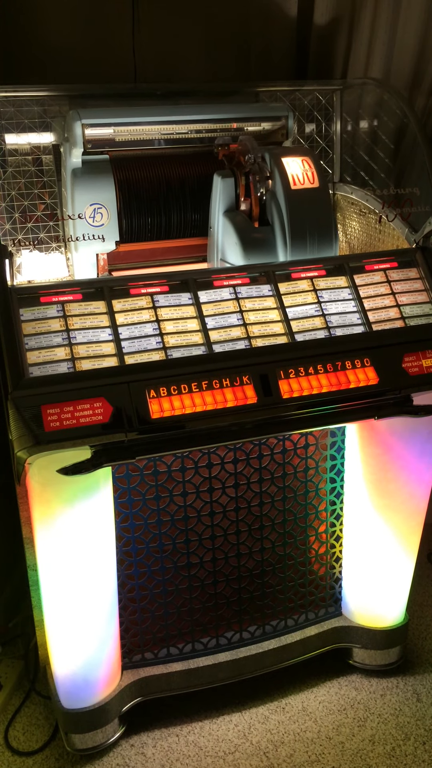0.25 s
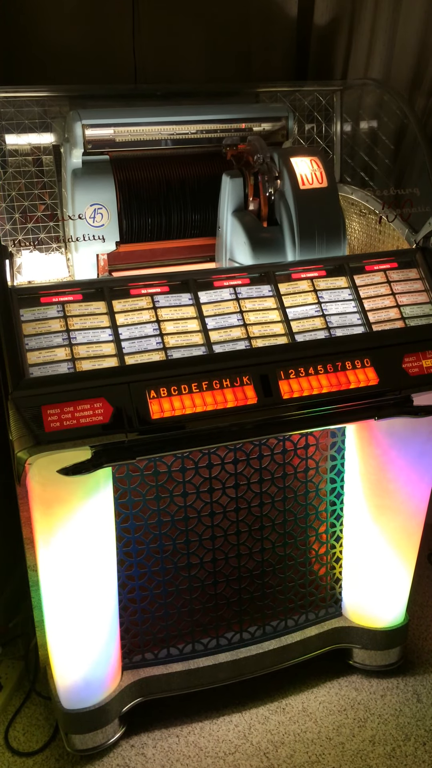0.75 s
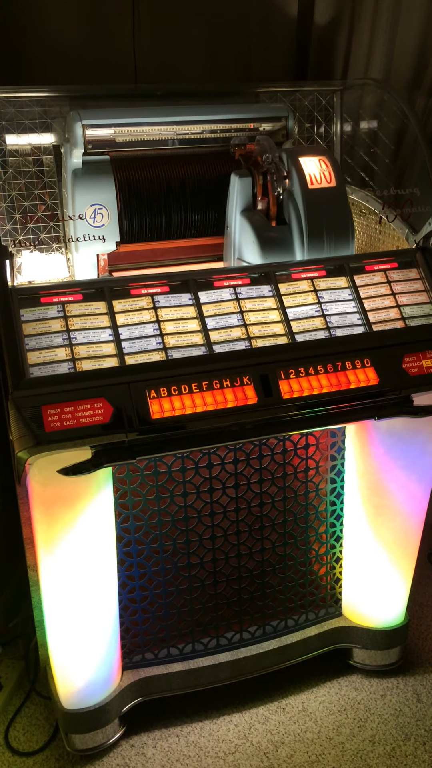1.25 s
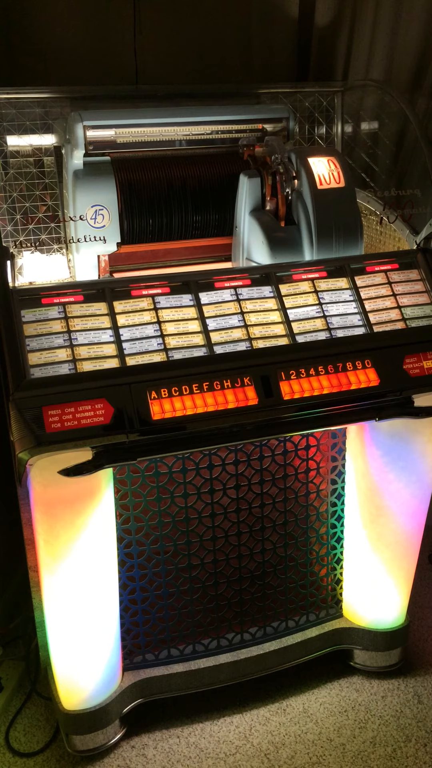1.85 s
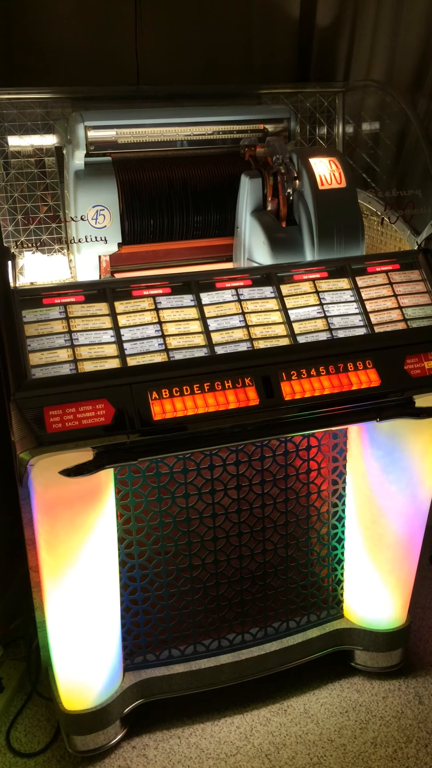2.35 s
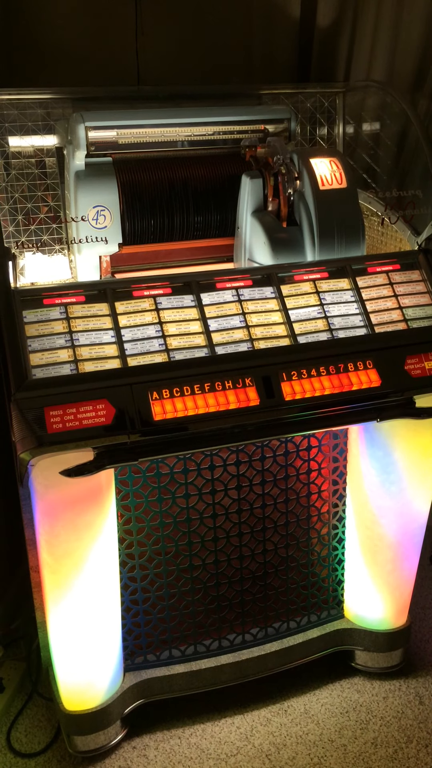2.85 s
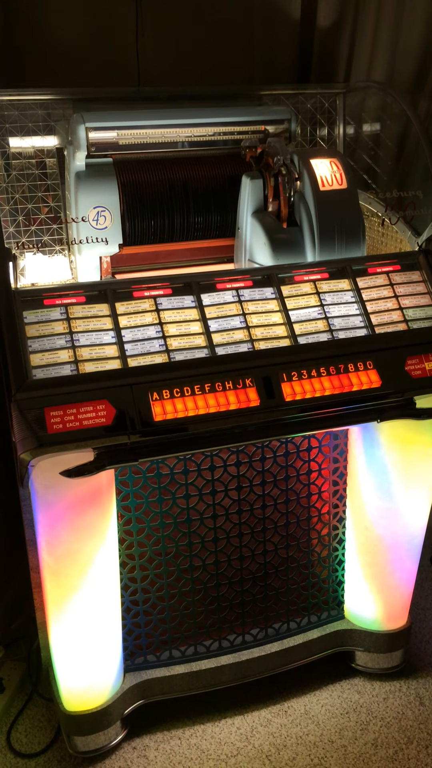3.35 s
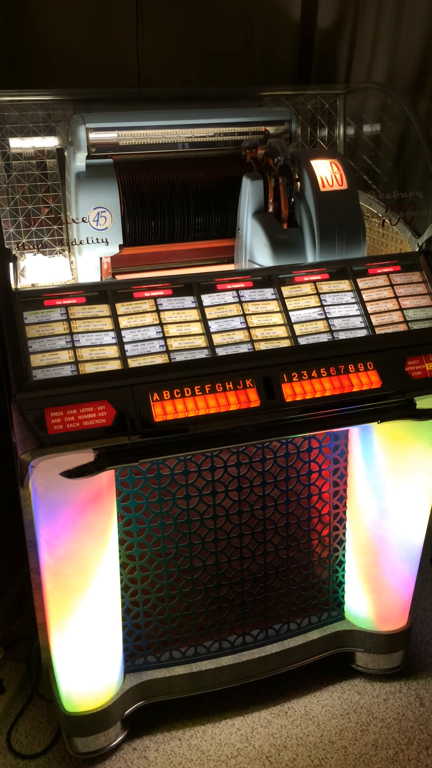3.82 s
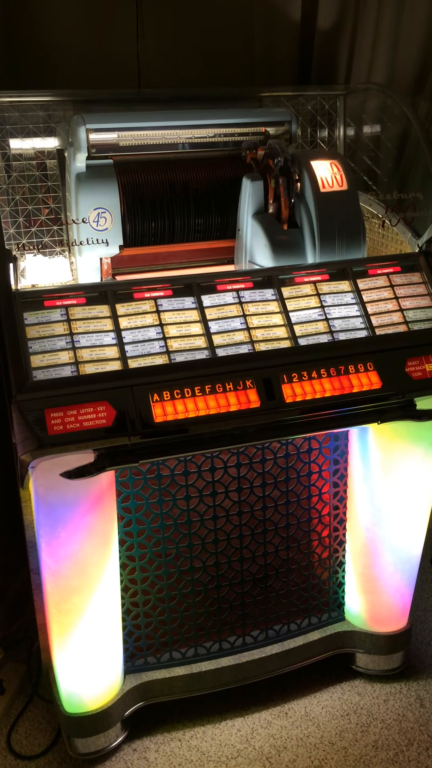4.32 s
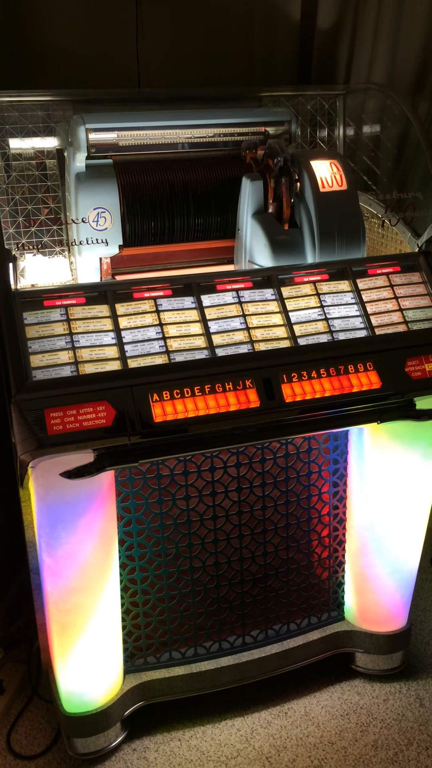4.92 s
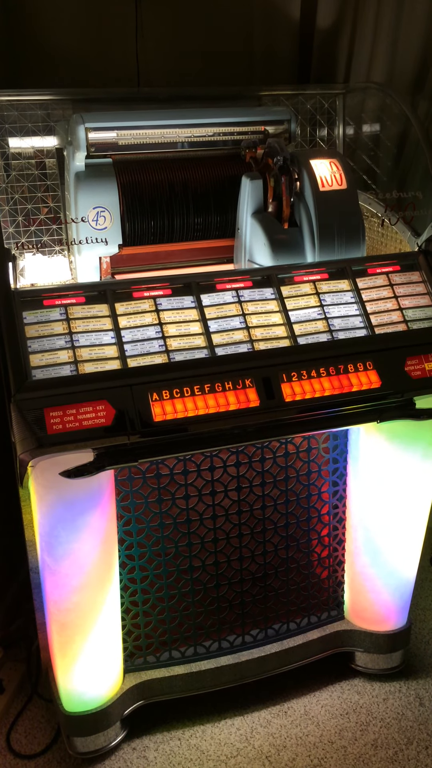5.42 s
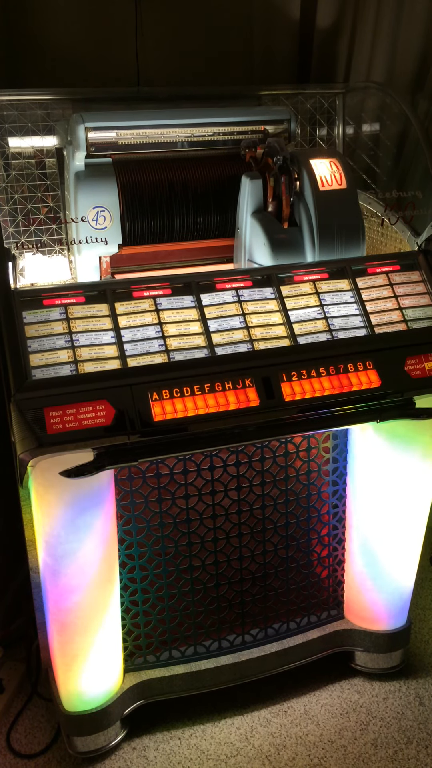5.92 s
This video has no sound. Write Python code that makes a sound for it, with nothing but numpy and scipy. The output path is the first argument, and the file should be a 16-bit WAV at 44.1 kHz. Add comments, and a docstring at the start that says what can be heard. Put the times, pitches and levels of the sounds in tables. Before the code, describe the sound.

Steel latches clunk over soft gear whirr as a jukebox loads a disc; its speaker thumps, scrapes, pops, then hums steadily.

```python
"""In a small room, one microphone hears a jukebox load a disc.
Under its glass dome latches, levers and the clamp strike: ringing steel in scattered noise, over the whirr of the gears.
The amplifier comes alive with bass thumps, damped cabinet modes; a rough brush scrape (shaped noise) starts and runs
on under the pop of the landing stylus, an impulse through the loudspeaker cone.
Mains hum (sines) and faint groove noise (shaped hiss) carry on."""
import sys
import numpy as np
from scipy import signal
from scipy.fft import rfft, irfft, next_fast_len
from scipy.io import wavfile
from scipy.ndimage import map_coordinates

SR = 44100
rng = np.random.default_rng(int(sys.argv[2]) if len(sys.argv) > 2 else 0)


def store_pcm(level_fs):
    """Save levels as 16-bit WAV."""
    pcm = np.round(np.clip(level_fs, -1, 1) * 32767).astype(np.int16)
    wavfile.write(sys.argv[1], SR, np.atleast_2d(pcm).T)


N = 272538
TIME = np.arange(N) / SR
TAIL = np.arange(SR // 2) / SR  # half a second for one strike, boom or pop to die away

# room tone: [f/Hz, relative level/dB per Hz]
ROOM_TONE_SPECTRUM = [(12, -57), (20, -47), (40, -7), (59, 1.5), (87, -8), (129, -8.5), (171, -6.5),
                      (306, -13), (382, -14), (491, -13.5), (746, -22), (811, -21.5), (4430, -39),
                      (14300, -43), (15500, -44)]
# reverberation of the small room: [f/Hz, t60/s]
ROOM_DECAY = [(100, 0.32), (500, 0.19), (1300, 0.29), (2700, 0.3), (4000, 0.23), (5500, 0.22),
              (10000, 0.16)]
# slightly unsteady hum of the transformer: [harmonic, level/dB]
TRANSFORMER_HUM = [(1, -69.5), (2, -71.5), (5, -75.5)]
# whirr of the gear teeth: [f/Hz, relative level/dB per Hz]
GEAR_SPECTRUM = [(100, 1), (300, 8.5), (600, 2), (1200, 2), (2000, -1), (3500, -10.5), (7000, -16),
                 (14000, -50)]
# cam strokes that load the motor: [start t/s, length/s, gear whirr/dB, cabinet drone/dB, rattle/dB]
CAM_STROKES = [(.63, 0.098, -73, -69.5, -83), (1.602, 0.44, -71.5, -67.5, -74.5),
               (2.683, .19, -72.5, -53, -74), (3.05, 0.51, -75.5, -76.5, -72.5),
               (3.862, 0.36, -61, -60, -56)]
# loose parts that rattle under load: [f/Hz, level/dB, top edge/dB, prominence of the pitch/dB]
LOOSE_PARTS = [(1860, -3, -15, 8), (3510, -1, -12, 7), (6500, -2, -14, 12.5), (10300, -17.5, -16, 19)]
# ringing of the steel frame: [f/Hz, level/dB, t60/s]
STEEL_MODES = [(362, 0.5, 0.063), (437, -8.5, 0.17), (521.3, 2.5, 0.14), (583, -10.5, 0.32),
               (644, -10, 0.26), (832.7, 0, 0.19), (966, -9.5, 0.33), (1247, -5, 0.21), (1737, 0.5, 0.14),
               (1914, -4, 0.21), (2240, -9.5, 0.058), (2390, -1.5, 0.066), (2500, -11, 0.25),
               (2740, -1, 0.17), (2827, -2, 0.1), (3330, -2, 0.14), (3960, -15, 0.23), (4610, -3.5, 0.089),
               (5200, -4.5, 0.066), (9540, -9, 0.13), (10100, -19, 0.1), (10100, -11, .17)]
# scattered noise of a steel contact: [f/Hz, relative level/dB per Hz]
CLATTER_SPECTRUM = [(60, -46), (150, -3), (300, -9), (600, 2.5), (1000, -3), (1800, -3.5), (3000, -2),
                    (5000, -3.5), (7500, -6), (10000, -6), (15000, -14.5)]
# decay under the glass dome: [f/Hz, t60/s]
DOME_DECAY = [(150, 0.54), (600, 0.24), (2500, 0.2), (6000, 0.15), (14000, 0.11)]
# single ticks and clicks, of levers and, at 5.2 s, of the brush:
# [t/s, level/dB, low knock/dB, top edge/dB, pitch of the part f/Hz, its prominence/dB]
SINGLE_CLICKS = [(1.749, -62, 13, -1, 5030, 10), (1.940, -52.5, -9, 2.5, 2970, 10.5),
                 (2.411, -59.5, -1, -15, 2220, 11.5), (2.688, -47.5, 7, -11.5, 570, 11),
                 (2.858, -66.5, -11, -2, 6000, 10), (3.234, -39, -14, -2.5, 2600, 5),
                 (3.528, -48, -4, -12.5, 1135, 12), (4.005, -47, -23, -23, 3680, 10.5),
                 (4.020, -48, -24, -23, 1790, 16), (4.221, -48.5, -10.5, -18.5, 1190, 11),
                 (4.879, -61.5, -14, 13, 12000, 10.5), (5.010, -33, -2.5, -3.5, 1990, 3),
                 (5.103, -50.5, -13, -25, 450, -2), (5.200, -59, 1, -21, 1000, 19)]
# latches that graze, slam and rebound, with a bass thud just after the slam; at 4.95 s it comes from the
# loudspeaker: [slam t/s, level/dB, low knock/dB, top edge/dB, rise/s, pitch of the part f/Hz,
# its prominence/dB, graze against the slam/dB, bass thud/dB, extra in its deep modes/dB]
LATCH_CLUNKS = [(1.846, -26.5, -11.5, -1, 0.0044, 5200, 2, -16.5, -51, 13),
                (3.841, -34, -5, -13, .0021, 1176, 12, -12, -47, -6),
                (4.944, -27, -1, -4.5, 0.006, 362, 10.5, -27, -23, -8)]
# bass modes of the cabinet, the two deep ones first: [f/Hz, level/dB, t60/s]
CABINET_MODES = [(80.3, -4, 0.32), (96.9, 0, 0.15), (128.1, 1.5, 0.23), (137.2, -11, 0.52)]
# hum of the amplifier: [harmonic, level/dB before the loudspeaker's level]
AMPLIFIER_HUM = [(1, -49.5), (2, -45), (4, -67.5), (5, -78.5)]
# rumble of the turntable: [f/Hz, relative level/dB per Hz]
RUMBLE_SPECTRUM = [(20, -27), (45, -5), (75, -8), (105, -7), (140, -8.5), (190, -31.5), (300, -37.5),
                   (600, -39.5), (1500, -63)]
# bass thumps: [t/s, level/dB, extra in the deep modes/dB, rise/s, delay of the swing back/s]
BASS_THUMPS = [(4.984, -23, 3.5, 0.0035, 0.14), (5.034, -20.5, -19, 0.0069, .109),
               (5.321, -21.5, 4.5, 0.0027, .053)]
# resonances of the loudspeaker cone: [f/Hz, width/Hz, level/dB]
CONE_RESONANCES = [(149, 43, -2.5), (346, 165, 6.5), (744, 316, 3.5), (1100, 200, -2), (1790, 554, -4.5),
                   (2930, 645, -1.5), (3630, 150, -1), (4020, 360, -11), (5060, 330, -21)]
# treble gain of the cone, a lift near 5 kHz, then a steep fall: [f/Hz, gain/dB]
CONE_TREBLE = [(2500, -2.5), (3600, -6), (4500, -9.5), (5100, 8), (6000, -2), (8000, -12), (10000, -35),
               (15000, -53)]
# scrape of the brush, ahead of the cone: [f/Hz, relative level/dB per Hz]
BRUSH_SPECTRUM = [(100, 5), (330, 2.5), (450, 2.5), (750, -1.5), (1400, -3), (1900, 0), (3000, -6.5),
                  (6000, -10)]
# hiss of the groove, lifted where the pickup resonates: [f/Hz, relative level/dB per Hz]
GROOVE_SPECTRUM = [(300, -24), (1500, -16), (2300, 1), (2900, 3.5), (3600, -2), (4300, -4), (5600, -13.5),
                   (8000, -14), (11000, -31)]
# resonances of the stylus: [f/Hz, width/Hz, level/dB]
STYLUS_RESONANCES = [(3520, 78, 5.5), (5030, 120, 11)]

MAINS_HZ = 59.7
IDLE_DB = -75  # the gears running free
LOAD_RISE_S, LOAD_FALL_S = 0.014, 0.068  # how fast a stroke takes up and sheds its load
RATTLE_PER_S = 11  # average ticks of each loose part
CLICK_RISE_S = 0.004
GRAZE_S, GRAZE_HZ = 0.013, 3800  # the catch slides just ahead of the slam
REBOUND_S, REBOUND_DB, REBOUND_HZ = 0.025, -16, 2840  # the latch falls back once; level against the slam
UNMUTE_S, UNMUTE_RISE_S = 4.94, 0.024
SWING_DB = -15  # the swing back, against its thump
TOP_HZ = 15450  # band limit of the recorder


def amp(db):
    """Decibels to gain."""
    return 10 ** (np.asarray(db) / 20)


def unit(x):
    """Scale to rms 1."""
    return x / np.sqrt(np.mean(x ** 2) + 1e-20)


def along(points, hz):
    """Read (f/Hz, value) points on a log frequency axis."""
    f, v = np.transpose(points)
    return np.interp(np.log(hz + 1), np.log(f + 1), v)


def wobble(rate):
    """A smooth random curve in time, rate knots a second."""
    knots = rng.standard_normal(int(N * rate / SR) + 4)
    return map_coordinates(knots, [TIME * rate])


def ripple(hz, spacing_hz):
    """A smooth random curve over frequency; its bends widen towards the treble."""
    knots = rng.standard_normal(512)
    return map_coordinates(knots, [np.log1p(hz / (8 * spacing_hz)) * 40], mode="mirror")


def gate(start, length, rise, fall):
    """Exponential attack from start, release once length has passed."""
    since = np.maximum(TIME - start, 0)
    return (1 - np.exp(-since / rise)) * np.exp(-np.maximum(since - length, 0) / fall)


def filtered(x, response):
    """Pass x through a response given as a function of frequency."""
    m = next_fast_len(len(x) + 8192)
    return irfft(rfft(x, m) * response(np.fft.rfftfreq(m, 1 / SR)), m)[:len(x)]


def noise(spectrum, count=N):
    """Coloured noise of rms 1."""
    return unit(filtered(rng.standard_normal(count), lambda hz: amp(along(spectrum, hz))))


def dying(x, times):
    """Let each frequency of x die at its own speed."""
    hz, t, z = signal.stft(x, SR, nperseg=256)
    decay = amp(-60 * t / along(times, hz)[:, None])
    return signal.istft(z * decay, SR, nperseg=256)[1][:len(x)]


def resonance(hz, centre, width):
    """Complex gain of one resonance, 1 at its centre."""
    return 1j * hz * width / (centre ** 2 - hz ** 2 + 1j * hz * width)


def modes(table):
    """One damped complex vibration for each (f/Hz, level/dB, t60/s) row."""
    return np.array([amp(db - 60 * TAIL / t60) * np.exp(2j * np.pi * hz * TAIL) for hz, db, t60 in table])


def add(track, s, sound):
    """Mix a sound in at time s."""
    part = track[round(s * SR):][:len(sound)]
    part += sound[:len(part)]


def mains(harmonics):
    """Harmonics of the mains, each slightly unsteady in level."""
    hum = np.zeros(N)
    for k, db in harmonics:
        level = np.sqrt(2) * amp(db + 0.77 * wobble(13))
        hum += level * np.sin(2 * np.pi * (round(k) * MAINS_HZ * TIME + rng.random()))
    return hum


def background(room_db=-61.5):
    """Room tone, barely wavering noise, and the slightly unsteady hum of the transformer."""
    return amp(room_db + 0.13 * wobble(5.5)) * noise(ROOM_TONE_SPECTRUM) + mains(TRANSFORMER_HUM)


def gears(rough_db=2.0, drone_hz=132, drone_width_hz=30):
    """While a cam lifts its load the gears whirr louder, the cabinet drones and loose parts rattle."""
    loads = np.zeros((3, N))
    for s, length, *levels in CAM_STROKES:
        loads += np.outer(amp(levels), gate(s, length, LOAD_RISE_S, LOAD_FALL_S))
    whirr, drone, shake = loads
    teeth = np.hypot(amp(IDLE_DB), whirr) * amp(rough_db * wobble(90)) * noise(GEAR_SPECTRUM)
    panel = unit(filtered(rng.standard_normal(N), lambda hz: resonance(hz, drone_hz, drone_width_hz) ** 2))
    return teeth + drone * panel + rattle(shake)


def rattle(load, scatter_db=4.5, knock_db=-8, rise=0.0032):
    """Each loose part ticks at uneven intervals and strengths, harder under more load."""
    out, frame = np.zeros(N), modes(STEEL_MODES)
    for hz, db, edge_db, part_db in LOOSE_PARTS:
        chance = rng.standard_normal((256, 2))  # columns: timing, strength
        slots = np.arange(len(chance)) + rng.random() + 0.3 * chance[:, 0]
        at = np.abs(slots * SR / RATTLE_PER_S).astype(int)
        ticks = load * np.bincount(at, amp(db + scatter_db * chance[:, 1]), N)[:N]
        out += signal.fftconvolve(ticks, strike(frame, knock_db, edge_db, rise, hz, part_db))[:N]
    return out


def strike(frame, knock_db, edge_db, rise, part_hz, part_db, level_db=2.0, ring_db=-12, crack_db=-2,
           crack_t60=0.065, knock_hz=800, edge_hz=5000, sharpness=16, ripple_db=1.0, spacing_hz=500):
    """One steel contact rings its part and the frame and scatters in the dome, so it swells for milliseconds."""
    scatter = dying(noise(CLATTER_SPECTRUM, count=len(TAIL)), DOME_DECAY)
    count = len(STEEL_MODES)
    strengths = amp(rng.normal(0, 1, count)) * np.exp(2j * np.pi * rng.random(count))
    ring = amp(ring_db) * (strengths @ frame).imag
    # cubed noise: the first reflections are still separate spikes
    spikes = rng.standard_normal(len(TAIL)) ** 3
    spikes = unit(filtered(spikes, lambda hz: amp(along(CLATTER_SPECTRUM, hz))))
    crack = amp(crack_db - 60 * TAIL / crack_t60) * spikes

    def colour(hz):
        # heavy parts knock low, small hard ones have a bright edge
        knock = knock_db / (1 + (hz / knock_hz) ** 2)
        edge = edge_db * hz ** 3 / (hz ** 3 + edge_hz ** 3)
        part = 1 + (amp(part_db) - 1) * resonance(hz, part_hz, part_hz / sharpness)
        # every point of impact favours other groups of modes
        return part * amp(knock + edge + ripple_db * ripple(hz, spacing_hz))

    swell = 1 - np.exp(-(TAIL / rise) ** 2)
    return amp(level_db) * swell * filtered(scatter + ring + crack, colour)


def clicks():
    """Single contacts, faint to loud, each struck once."""
    out, frame = np.zeros(N), modes(STEEL_MODES)
    for s, db, knock_db, edge_db, part_hz, part_db in SINGLE_CLICKS:
        add(out, s, amp(db) * strike(frame, knock_db, edge_db, CLICK_RISE_S, part_hz, part_db))
    return out


def clunks(thud_lag_s=0.00716, thud_rise_s=0.0093, graze_edge_db=5, rebound_edge_db=6):
    """A latch grazes its catch, slams home and rebounds, graze and rebound brighter; a bass thud follows the slam."""
    out, frame = np.zeros(N), modes(STEEL_MODES)
    for s, db, knock_db, edge_db, rise, part_hz, part_db, graze_db, thud_db, deep_db in LATCH_CLUNKS:
        graze = strike(frame, knock_db=3, edge_db=edge_db + graze_edge_db,
                       rise=0.0066, part_hz=GRAZE_HZ, part_db=10.5)
        slam = strike(frame, knock_db, edge_db, rise, part_hz, part_db)
        rebound = strike(frame, knock_db=2.5, edge_db=edge_db + rebound_edge_db,
                         rise=0.0013, part_hz=REBOUND_HZ, part_db=10.5)
        add(out, s - GRAZE_S, amp(db + graze_db) * graze)
        add(out, s, amp(db) * slam)
        add(out, s + REBOUND_S, amp(db + REBOUND_DB) * rebound)
        add(out, s + thud_lag_s, amp(thud_db) * boom(deep_db, thud_rise_s))
    return out


def boom(deep_db, rise):
    """One push, from a latch or the loudspeaker, sets the cabinet's bass modes booming."""
    box = modes(CABINET_MODES).imag
    both = amp(deep_db) * box[:2].sum(axis=0) + box[2:].sum(axis=0)
    return both * (1 - np.exp(-TAIL / rise))


def loudspeaker(rumble_db=-49, level_db=-1.6):
    """Once unmuted, the amplifier plays its own hum and the turntable's rumble."""
    awake = 1 - np.exp(-np.maximum(TIME - UNMUTE_S, 0) / UNMUTE_RISE_S)
    return amp(level_db) * awake * (mains(AMPLIFIER_HUM) + amp(rumble_db) * noise(RUMBLE_SPECTRUM))


def thumps():
    """The waking amplifier and the landing stylus push the cone, which swings back more weakly."""
    out = np.zeros(N)
    for s, db, deep_db, rise, swing_s in BASS_THUMPS:
        push = amp(db) * boom(deep_db, rise)
        add(out, s, push)
        add(out, s + swing_s, amp(SWING_DB) * push)
    return out


def cone(x):
    """The loudspeaker: broad resonances of alternating sign, a lift near 5 kHz, then a steep fall."""
    def response(hz):
        peaks = sum((-1) ** k * amp(db) * resonance(hz, centre, width)
                    for k, (centre, width, db) in enumerate(CONE_RESONANCES))
        return peaks * amp(along(CONE_TREBLE, hz))
    return filtered(x, response)


def brush(start_s=5.08, length_s=0.17, rise_s=0.015, fall_s=0.14, level_db=-52.0, rough_db=3):
    """Rough scraping noise starts before the pop and fades out under and after it, coloured by the loudspeaker."""
    scrape = unit(cone(noise(BRUSH_SPECTRUM) * amp(rough_db * wobble(220))))
    return amp(level_db) * gate(start_s, length_s, rise_s, fall_s) * scrape


def stylus(land_s=5.3157, pop_db=-14, room_db=2.0, early_gain=2.2, early_s=0.0016, absorb_hz=8000):
    """The stylus lands with one sharp pop from the loudspeaker; cabinet and room answer, a little duller."""
    pop = cone(1. * (TAIL == 0))
    pop *= amp(pop_db) / np.abs(pop).max()  # pop_db is the peak level
    walls = dying(rng.standard_normal(len(TAIL)), ROOM_DECAY)
    walls *= 1 + early_gain * np.exp(-TAIL / early_s)  # stronger early reflections
    walls = filtered(walls / np.linalg.norm(walls), lambda hz: 1 / (1 + 1j * hz / absorb_hz))
    answer = amp(room_db) * signal.fftconvolve(pop, walls)[:len(TAIL)]
    out = np.zeros(N)
    add(out, land_s, pop + answer)
    return out


def groove(start_s=5.33, level_db=-76, rough_db=2, worn_s=5.82, worn_width_s=0.12, worn_db=8,
           scuff_db=3.0, scuffs_per_s=35):
    """The stylus rubs unevenly along the lead-in groove, harder over a worn patch, and sings at its resonances."""
    def sing(hz):
        return 1 + sum(amp(db) * resonance(hz, centre, width) for centre, width, db in STYLUS_RESONANCES)
    rub = unit(filtered(noise(GROOVE_SPECTRUM) * amp(rough_db * wobble(330)), sing))
    worn = worn_db * np.exp(-((TIME - worn_s) / worn_width_s) ** 2)
    friction_db = worn + scuff_db * wobble(scuffs_per_s)
    return amp(level_db + friction_db) * rub * (TIME > start_s)


def scene():
    """All sources at one microphone."""
    mechanism = gears() + clicks() + clunks()
    playback = loudspeaker() + thumps() + brush() + stylus() + groove()
    return (background() + mechanism + playback)[None]


def record(dry, low_cut_hz=34):
    """The microphone loses the deepest bass, and the recorder keeps nothing above its band limit."""
    lean = filtered(dry[0], lambda hz: hz ** 4 / (hz ** 4 + low_cut_hz ** 4))
    return filtered(lean, lambda hz: 1 / np.sqrt(1 + (hz / TOP_HZ) ** 300))[None]


dry = scene()
out = record(dry)
store_pcm(out)
```